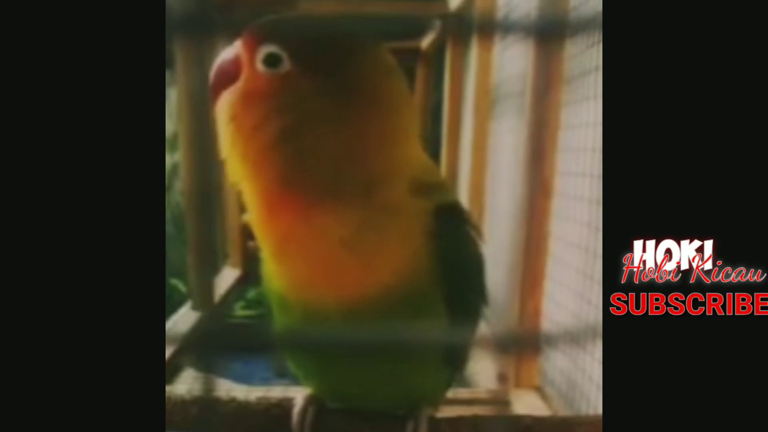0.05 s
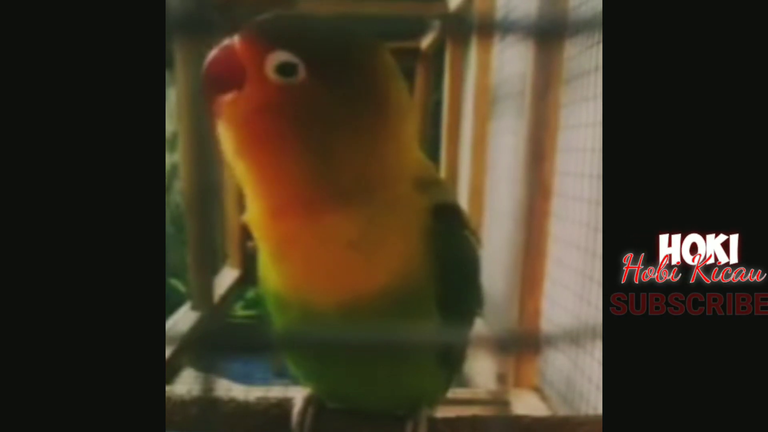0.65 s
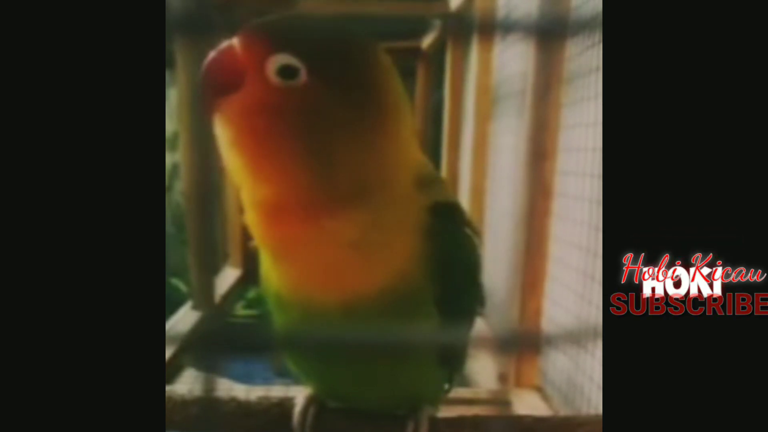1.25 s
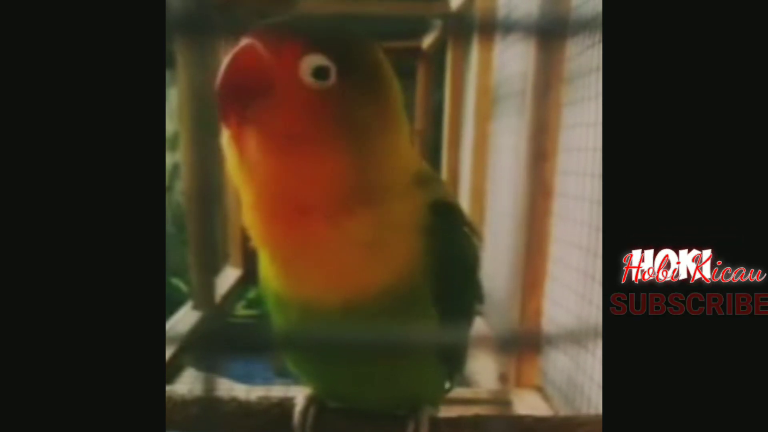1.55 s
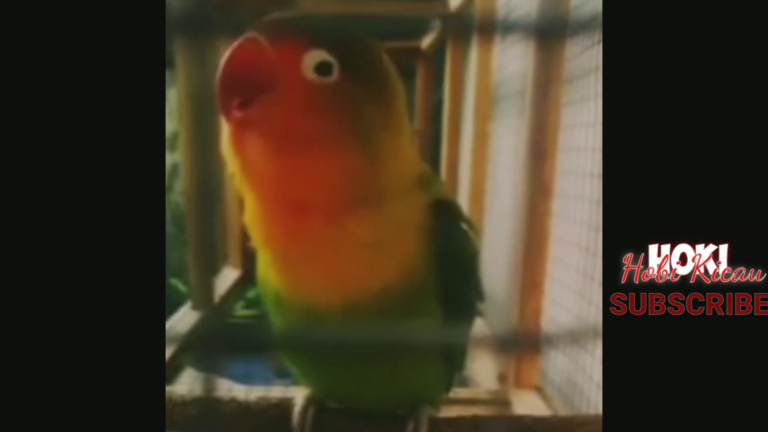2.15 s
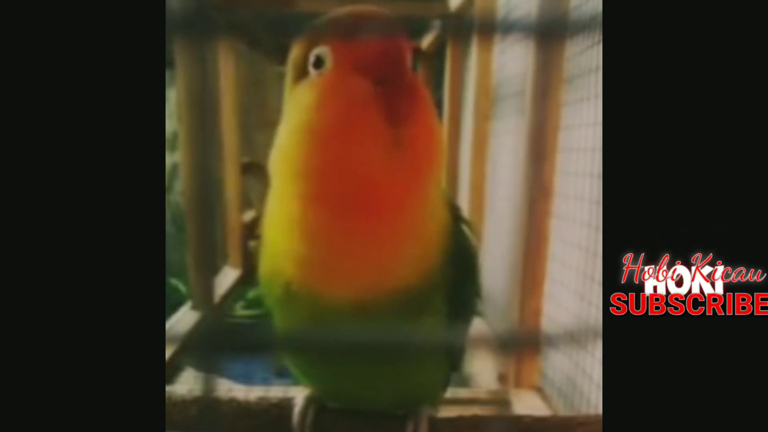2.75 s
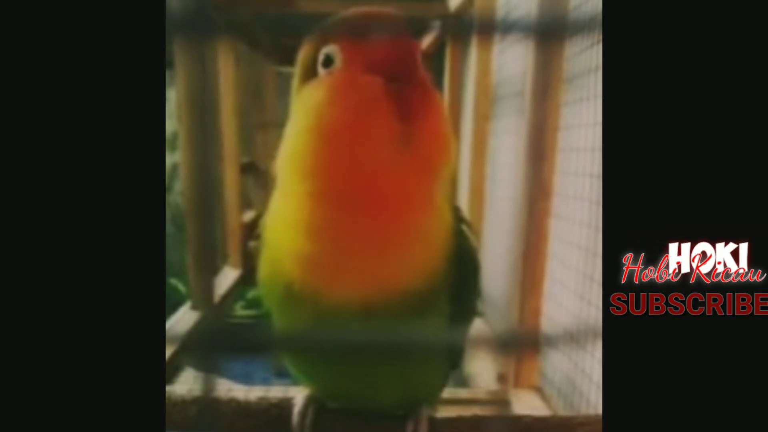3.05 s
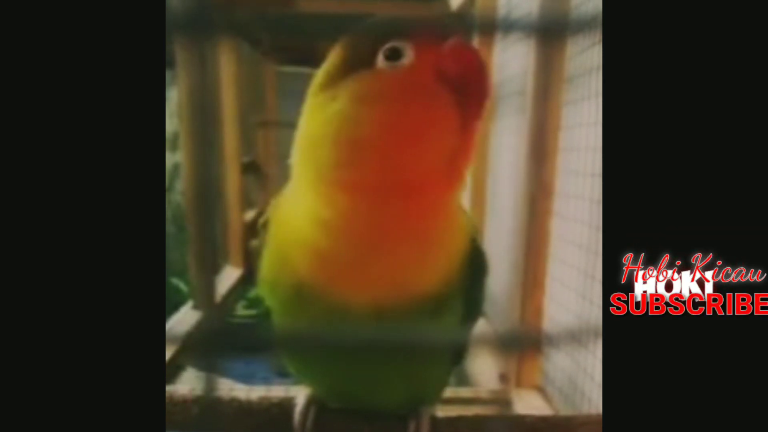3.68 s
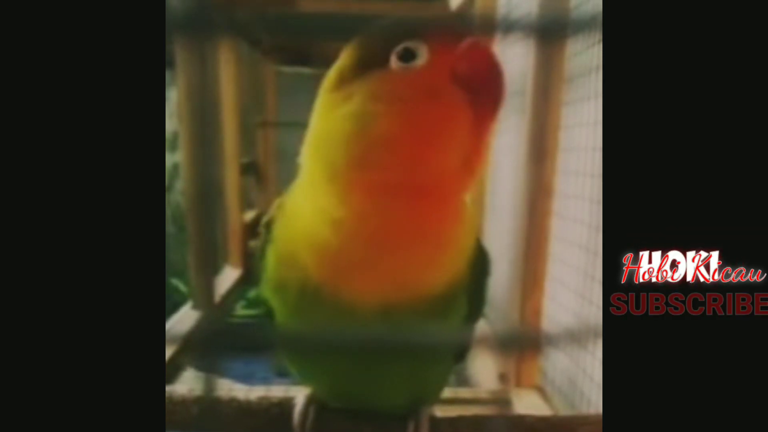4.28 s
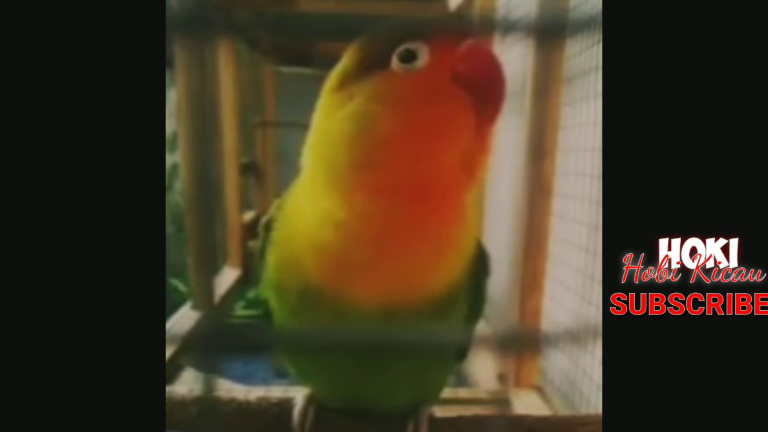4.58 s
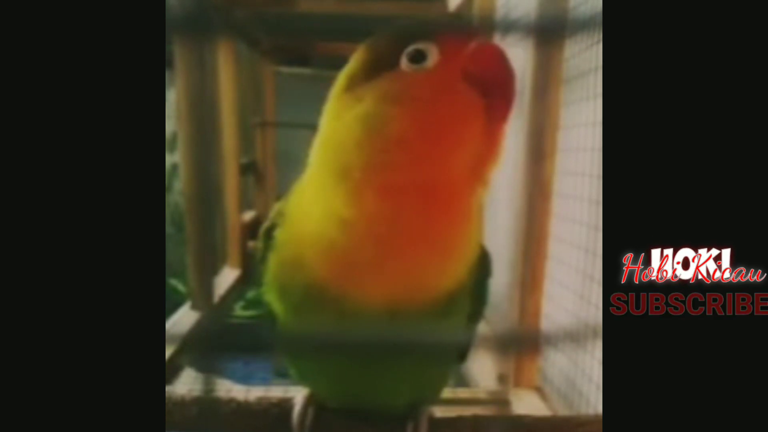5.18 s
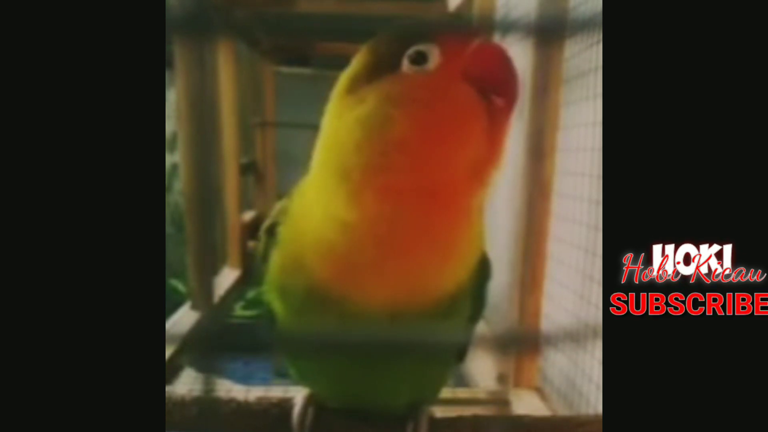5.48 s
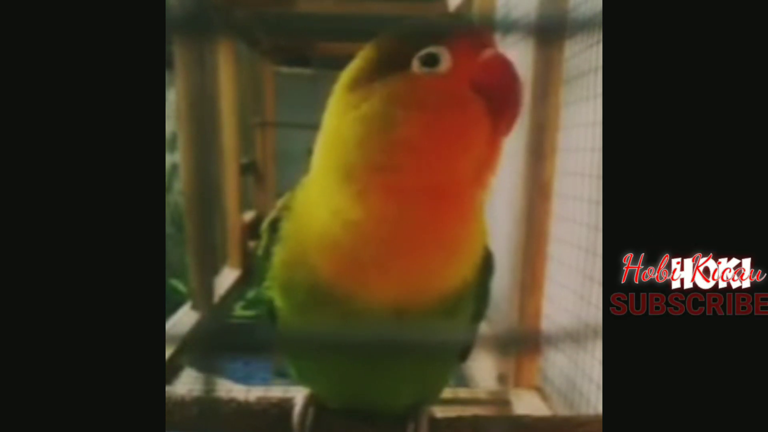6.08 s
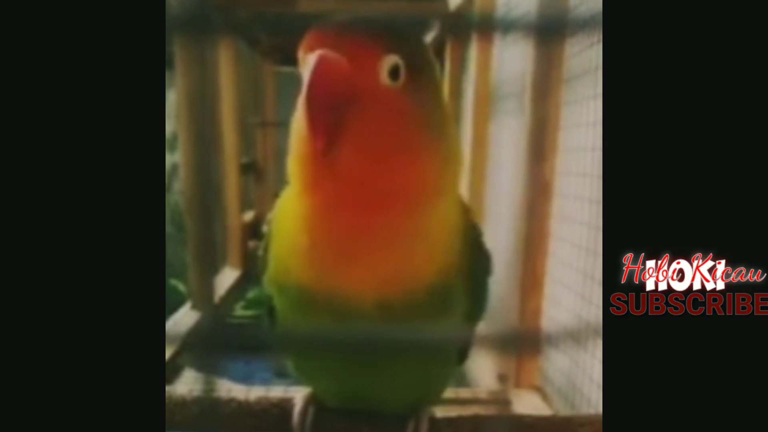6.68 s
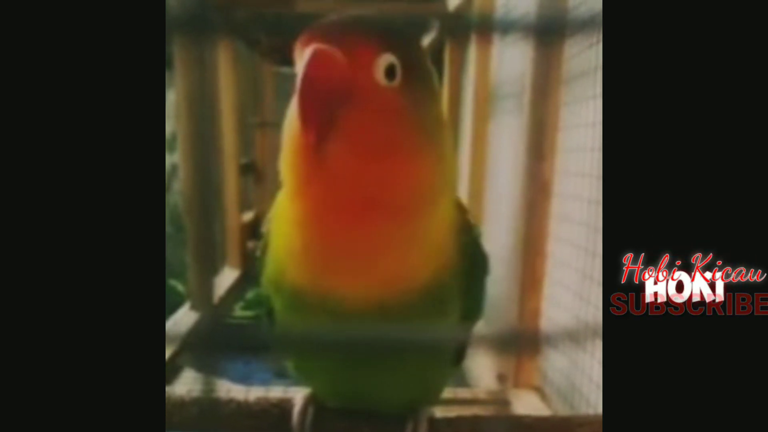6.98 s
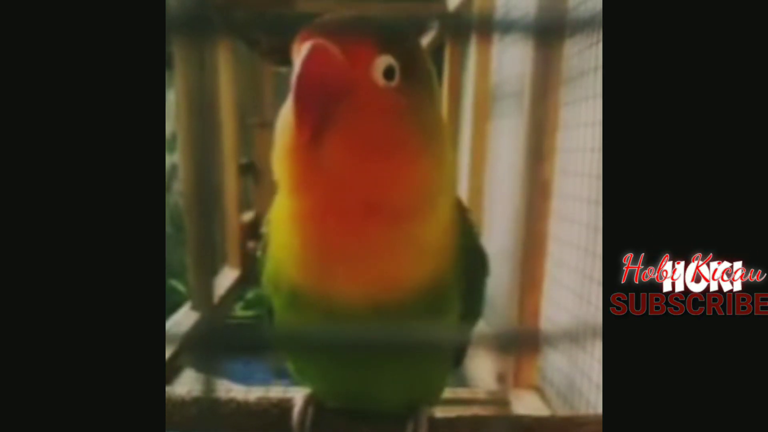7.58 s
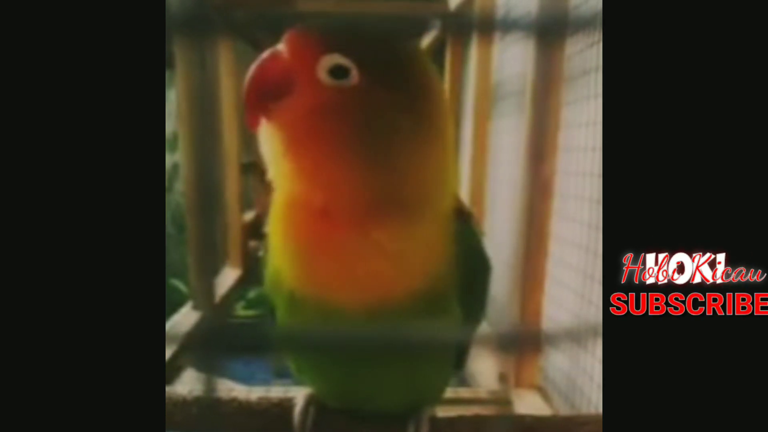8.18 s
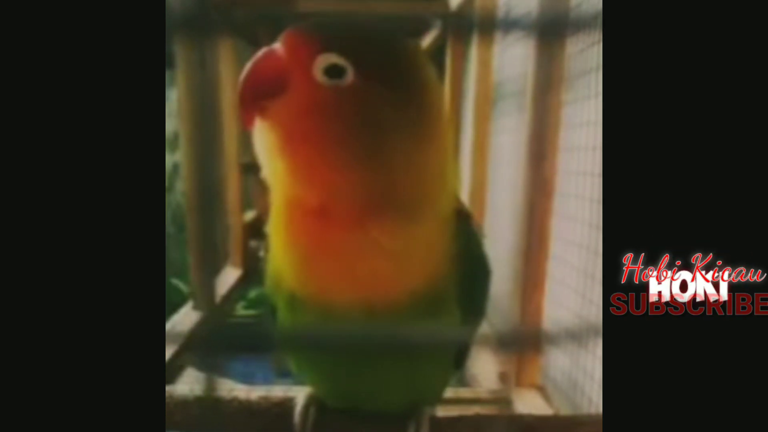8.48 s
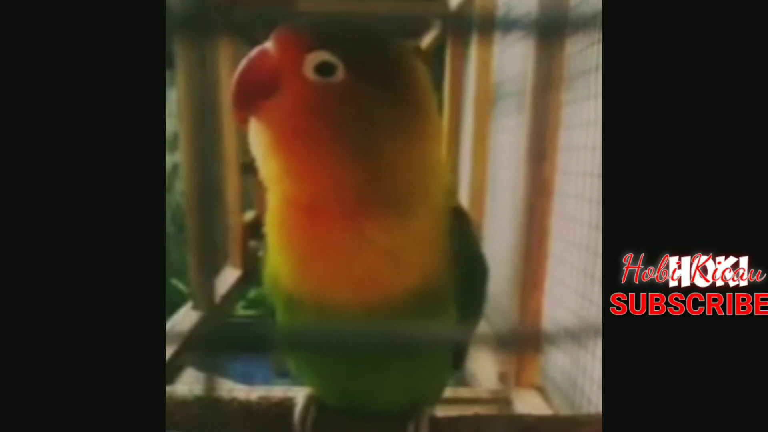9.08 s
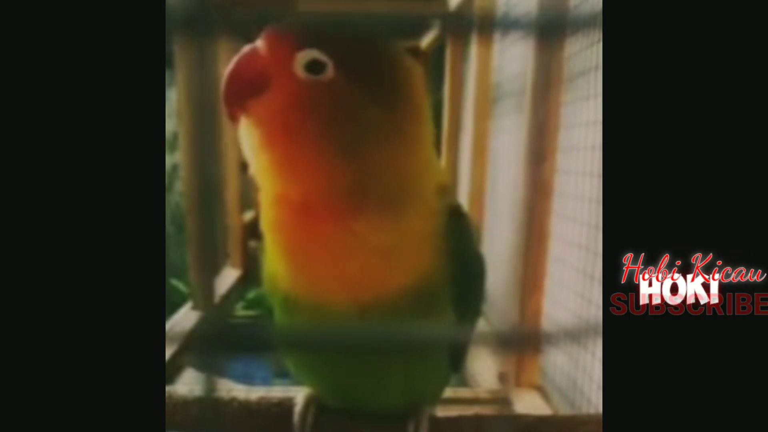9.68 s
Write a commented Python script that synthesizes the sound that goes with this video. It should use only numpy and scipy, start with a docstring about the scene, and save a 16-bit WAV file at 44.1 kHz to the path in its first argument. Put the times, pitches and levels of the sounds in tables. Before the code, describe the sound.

Close up, a small parrot in a cage sings a rapid string of high, flicking whistles that repeatedly break into a brighter, harsher rasp. After one short gap it resumes slightly lower and slower, then turns shrill again. Thin whistles from other birds come from further away near the start and later on, with a short room echo and faint background noise.

```python
"""Caged lovebird chattering

A close lovebird chatters about seven syllables a second, with one short pause. Each syllable is a
whistle that flicks up and slides down; in bouts the bird pushes harder and the voice breaks into a
shrill rasp. Cage and room ring after each one. Other birds whistle further off, over soft noise."""
import sys
import numpy as np
from scipy import signal
from scipy.fft import rfft, irfft
from scipy.io import wavfile
from scipy.ndimage import uniform_filter1d

SR = 44100
rng = np.random.default_rng(int(sys.argv[2]) if len(sys.argv) > 2 else 0)


def master_out(mix):
    """Clip the mix to full scale and print it as 16-bit PCM to the path in sys.argv[1]."""
    frames = np.transpose(np.atleast_2d(mix))
    ceiling = np.clip(frames, -1, 1)
    pcm = np.round(ceiling * 32767).astype(np.int16)
    wavfile.write(sys.argv[1], SR, pcm)


N = 433944
LEAD = SR // 10  # samples of chatter before time zero


# Clear syllables: flick_s, top_hz, hold_s, level_db
CLEAR_SYLLABLES = [(-.031, 3784, .025, -22), (.141, 3680, 0.032, -21.5), (.303, 3686, 0.035, -21.5),
                   (1.008, 3790, 0.026, -22.5), (1.156, 3975, 0.028, -21.5), (1.302, 3827, 0.031, -22),
                   (1.435, 3825, 0.027, -21.5), (1.581, 3710, 0.029, -20.5), (1.712, 3700, .026, -21.5),
                   (1.842, 3937, 0.026, -20.5), (2.538, 4017, .025, -18), (2.667, 3870, 0.03, -19),
                   (2.819, 3890, 0.027, -21), (2.957, 3914, 0.022, -20), (3.113, 3900, 0.022, -21.5),
                   (3.253, 3916, .022, -20.5), (3.396, 4096, 0.023, -19.5), (3.966, 3960, .028, -21),
                   (4.117, 3828, 0.028, -22), (4.275, 3787, 0.027, -22.5), (4.436, 3785, 0.024, -21.5),
                   (4.578, 3865, 0.021, -22), (4.715, 3800, 0.032, -21.5), (4.863, 3945, 0.024, -21),
                   (5.005, 3867, 0.026, -22), (5.142, 3945, 0.026, -22), (5.274, 4020, 0.022, -21.5),
                   (5.972, 4133, .025, -20.5), (6.586, 3453, .02, -21), (6.83, 3626, 0.024, -21.5),
                   (6.978, 3628, 0.028, -20), (7.144, 3637, 0.03, -19), (7.318, 3520, .027, -19),
                   (7.483, 3623, 0.03, -19.5), (7.65, 3595, 0.031, -20.5), (7.837, 3620, 0.031, -22),
                   (8.01, 3610, 0.031, -21.5), (8.186, 3524, 0.029, -20.5), (8.361, 3600, 0.03, -21.5),
                   (8.543, 3680, 0.031, -21), (9.43, 4017, 0.031, -20), (9.579, 3865, 0.025, -21.5),
                   (9.729, 3863, 0.028, -21)]

def clear_chatter():
    """Clear whistles; those pushed above break_hz start to rasp."""
    out = np.zeros(LEAD + N)
    break_hz, break_db_per_hz = 3917, .0781
    pitch = dict(foot_hz=2120, flick_s=.001276, end_hz=1099, slide_share=1.4)
    effort = dict(ahead_s=.0002, attack_db_per_s=2450, sag_db_per_s=75, release_db_per_s=1900,
                  treble_fade_db_per_s=169.5, treble_shut_db=4, burst_db=0)
    for flick_s, top_hz, hold_s, level_db in CLEAR_SYLLABLES:
        flick_s += LEAD / SR
        rasp_db = -23 + break_db_per_hz * max(top_hz - break_hz, 0)
        sheen_db = np.array([-11, -9.5, -28]) + 1.3 * rng.standard_normal()
        add(out, *syllable(flick_s, top_hz, hold_s, level_db, rasp_db, sheen_db, pitch, effort,
                           jitter=.04, wander=.028, flutter_hz=700, grain_db=4, treble_grain_db=4,
                           scratch=.45, rasp_noise=.6, sheen_noise=.26))
        add(out, *tick(flick_s - .016))
    return out


# Shrill syllables: flick_s, level_db, brightness_db
SHRILL_SYLLABLES = [(.449, -26.5, 0.5), (.588, -26, 7.5), (0.729, -26, 3), (.867, -26, -12),
                    (1.975, -29.5, 4), (2.11, -28, 2.5), (2.246, -25, 6), (2.386, -25.5, 4),
                    (3.539, -27.5, 4.5), (3.668, -27, -1), (3.816, -28, -13.5), (5.403, -27.5, -8.5),
                    (5.535, -27, -1.5), (5.681, -25, -0.5), (5.83, -23.5, -11.5), (8.712, -26, 5.5),
                    (8.861, -26.5, 7.5), (9.003, -27, 10), (9.147, -26, 6), (9.294, -25.5, -7.5)]

def shrill_chatter():
    """Pushed harder, the voice breaks into a rasp. Duller syllables slide down more slowly."""
    out = np.zeros(LEAD + N)
    effort = dict(ahead_s=.0068, attack_db_per_s=2201, sag_db_per_s=32.5, release_db_per_s=1201,
                  treble_fade_db_per_s=21, treble_shut_db=4.5, burst_db=2)
    for flick_s, level_db, brightness_db in SHRILL_SYLLABLES:
        flick_s += LEAD / SR
        top_hz = 5322 * rng.lognormal(0, .04)
        hold_s = .02 * rng.lognormal(0, .07)
        rasp_db = 3.5
        sheen_db = np.array([.7, 5, -4.5]) + brightness_db * np.array([.21, .3, .85])
        slide_share = .14 + .05 * max(-brightness_db, 0)
        pitch = dict(foot_hz=2324, flick_s=.003, end_hz=2420, slide_share=slide_share)
        add(out, *syllable(flick_s, top_hz, hold_s, level_db, rasp_db, sheen_db, pitch, effort,
                           jitter=.08, wander=.085, flutter_hz=550, grain_db=5, treble_grain_db=3.5,
                           scratch=.7, rasp_noise=.33, sheen_noise=.45))
        add(out, *tick(flick_s - .023))
    return out


# Treble lines parallel to the whistle, each in a band of hiss: above_hz, low_hz, high_hz
SHEEN_LINES = [(3955, 5840, 8190), (6870, 8720, 11220), (10050, 11720, 14900)]

def syllable(flick_s, top_hz, hold_s, level_db, rasp_db, sheen_db, pitch, effort,
             jitter, wander, flutter_hz, grain_db, treble_grain_db, scratch, rasp_noise, sheen_noise):
    """One gliding whistle with a rasp, plus a sheen of thin treble lines gliding parallel to it."""
    t = np.arange(-1600, 2496) / SR
    size = len(t)
    waver = 1 + jitter * flutter(size, flutter_hz) + wander * flutter(size, 130)
    cycles = np.cumsum(glide(t, top_hz, hold_s, **pitch) * waver) / SR
    whistle_db, treble_db = push(t, hold_s, **effort)
    grain = np.tanh(flutter(size, flutter_hz))
    fade = signal.windows.tukey(size, .1)
    whistle_env = fade * gain_of(whistle_db + grain_db * grain)
    treble_env = fade * gain_of(treble_db + treble_grain_db * grain)
    # Until they lock onto the note, the membranes scratch and sound the octave.
    unlocked = 1 / (1 + np.exp((t + effort["ahead_s"] + .0066) / .0022))
    octave = np.sin(4 * np.pi * cycles)
    onset = unlocked * (.66 * octave + scratch * band_noise(size, 3800, 5400))
    sound = unit_rms(whistle_env * (np.sin(2 * np.pi * cycles) + onset))
    # Rasp: the ragged octave through the open beak's resonance.
    beak_hz = (4210, 6100)
    rasp = blend(unit_rms(band_pass(octave, *beak_hz)), band_noise(size, *beak_hz), rasp_noise)
    sound += gain_of(rasp_db) * unit_rms(np.sqrt(whistle_env * treble_env) * rasp)
    for (above_hz, low_hz, high_hz), line_db in zip(SHEEN_LINES, sheen_db):
        line = unit_rms(np.sin(2 * np.pi * (cycles + above_hz * t + rng.random())))
        sheen = treble_env * blend(line, band_noise(size, low_hz, high_hz), sheen_noise)
        sound += gain_of(line_db) * unit_rms(band_pass(sheen, low_hz, high_hz, order=12))
    # Nearest-wall bounces; delays differ per syllable as the bird bobs.
    heard = sound.copy()
    for delay_s in rng.uniform(.003, .011, size=2):
        add(heard, delay_s, gain_of(-15) * sound)
    return flick_s + t[0], gain_of(level_db) * heard


def glide(t, top_hz, hold_s, foot_hz, flick_s, end_hz, slide_share):
    """Pitch in Hz: a creep, a quick flick to the top at t = 0, a slide down."""
    creep_hz_per_s = 27000
    up = foot_hz + creep_hz_per_s * t + (top_hz - foot_hz) * np.exp(-abs(t) / flick_s)
    down = end_hz + (top_hz - end_hz) * np.exp(-abs(t) / (slide_share * hold_s))
    return np.where(t < 0, up, down)


def push(t, hold_s, ahead_s, attack_db_per_s, sag_db_per_s, release_db_per_s,
         treble_fade_db_per_s, treble_shut_db, burst_db, burst_s=.0025):
    """Attack, sagging hold and release in dB. The treble opens at the flick and fades faster."""
    before_s, since_s, after_s = np.maximum([-t - ahead_s, t, t - hold_s], 0)
    whistle_db = -attack_db_per_s * before_s - sag_db_per_s * since_s - release_db_per_s * after_s
    opening_db = np.where(t < 0, -treble_shut_db, burst_db * np.exp(-since_s / burst_s))
    return whistle_db, whistle_db + opening_db - treble_fade_db_per_s * since_s


def tick(start_s):
    """Faint dry pulse ahead of a syllable. Returns start_s, sound."""
    t = np.arange(512) / SR
    offset_s, level_db = rng.normal(0, .002), rng.normal(-32.5, 1.5)
    puff = band_noise(len(t), 1400, 3400) + .7 * band_noise(len(t), 3000, 9500)
    envelope = t / .00085 * np.exp(-t / .0016)
    return start_s + offset_s, gain_of(level_db) * puff * envelope


# Cage wall reflections: delay_ms, gain_db
CAGE_ECHOES = [(2.93, -30.5), (6.93, -29), (13.4, -28), (17.8, -33)]
# Cage peaks and hollows: centre_hz, width_hz, gain_db
CAGE_RESONANCES = [(2194, 69, 10), (2223, 80, -6), (2493, 132, 6), (2641, 42, -4), (2734, 183, 5),
                   (2955, 40, 6.5), (3120, 34, -0.5), (3835, 46, -10.5), (4470, 31, -22), (6170, 280, -6),
                   (8500, 53, -5.5), (11940, 380, 6.5)]

def cage(x):
    """Wall echoes, then the cage's colour as a minimum-phase filter."""
    echoed = x.copy()
    for delay_ms, gain_db in CAGE_ECHOES:
        add(echoed, delay_ms / 1000, gain_of(gain_db) * x)
    hz = abs(np.fft.fftfreq(4096, 1 / SR))
    colour_db = sum(gain_db * np.exp(-((hz - centre_hz) / width_hz) ** 2)
                    for centre_hz, width_hz, gain_db in CAGE_RESONANCES)
    log_spectrum = np.conj(signal.hilbert(np.log(gain_of(colour_db))))
    impulse = np.fft.ifft(np.exp(log_spectrum)).real
    return signal.oaconvolve(echoed, impulse)[:len(x)]


# Room decay: frequency_hz, t60_s
ROOM_DECAY = [(300, 0.27), (2000, 0.25), (3000, 0.25), (5000, 0.33), (7500, 0.32), (10000, 0.26),
              (14000, 0.29)]

def room_tail(x):
    """Sparse reflections of random sign, each band dying at its own rate."""
    size = SR // 2
    taps = rng.choice([-1., 1.], size) * (rng.random(size) < .15)
    hz, t, spectrum = signal.stft(taps, SR, nperseg=256)
    decay = gain_of(-60 * t / curve_at(ROOM_DECAY, hz)[:, None])
    tail = signal.istft(spectrum * decay, SR, nperseg=256)[1]
    age_s = np.arange(len(tail)) / SR
    # Early cage reflections give way to the weaker room.
    tail *= (1 - np.exp(-age_s / .00033)) * (1 + 1.31 * np.exp(-age_s / .057))
    return signal.fftconvolve(x, tail / np.linalg.norm(tail))[:len(x)]


def shifting_room(x):
    """Three tails crossfade slowly as the bird turns its head."""
    crossfade_hz = .599
    cycles = crossfade_hz * np.arange(len(x)) / SR
    return np.sqrt(2 / 3) * sum(room_tail(x * np.cos(np.pi * (cycles + k / 3))) for k in range(3))


# Other birds: start_s, length_s, first_hz, last_hz, level_db
FAR_CALLS = [(0.185, 0.082, 4485, 4780, -31.5), (0.263, 0.18, 4700, 4645, -35.5),
             (0.628, 0.23, 2515, 2665, -36.5), (0.937, 0.22, 3860, 3450, -30),
             (3.83, 0.044, 4640, 4470, -47), (7.397, 0.13, 2870, 3040, -37.5),
             (7.717, 0.13, 2420, 2430, -33.5), (7.923, 0.19, 2950, 2890, -31.5),
             (8.214, 0.15, 2290, 2355, -35)]

def far_birds():
    """Thin, wavering whistles on straight glides."""
    out = np.zeros(N)
    for start_s, length_s, first_hz, last_hz, level_db in FAR_CALLS:
        size = int(length_s * SR)
        waver = 1 + .014 * flutter(N // 16, rate_hz=250)[:size]
        hz = np.linspace(first_hz, last_hz, size) * waver
        whistle = np.sin(2 * np.pi * np.cumsum(hz) / SR) * signal.windows.tukey(size, .5)
        add(out, start_s, gain_of(level_db) * unit_rms(whistle))
    return out


# Distant hollow sounds: start_s, length_s, centre_hz, width_hz, level_db
FAR_PUFFS = [(3.521, 0.076, 1100, 403, -38), (3.748, 0.089, 1040, 500, -45), (3.885, 0.14, 1347, 250, -35),
             (3.793, 0.24, 500, 450, -52.5), (4.43, 0.15, 853, 249.4, -57), (6.083, 0.072, 847, 120, -53.5),
             (6.072, 0.073, 1260, 200, -51.5)]

def far_puffs():
    """Faint, dull swells of narrow-band noise."""
    out = np.zeros(N)
    for start_s, length_s, centre_hz, width_hz, level_db in FAR_PUFFS:
        size = int(length_s * SR)
        noise = band_noise(SR, centre_hz - width_hz / 2, centre_hz + width_hz / 2)[:size]
        add(out, start_s, gain_of(level_db) * unit_rms(noise * np.hanning(size)))
    return out


# Background spectrum: frequency_hz, relative_db
AIR_SPECTRUM = [(25, -5.5), (80, -14.5), (160, -3.5), (280, 1), (450, -3), (800, 2), (1500, -5.5),
                (2400, -10.5), (6000, -25), (15000, -37.5)]
# Background level: time_s, level_db
AIR_LEVEL = [(0.0, -61), (2.27, -58), (3.92, -54), (4.11, -61.5), (5.7, -58.5), (6.0, -56), (6.19, -68.5),
             (6.58, -65.5), (7.01, -54), (7.34, -51.5), (7.97, -65), (8.52, -61.5), (8.85, -50.5),
             (9.84, -60)]

def air():
    """Soft, patchy background noise that sinks in the pause."""
    frames = dict(fs=SR, nperseg=2048, noverlap=1536)
    hz, _, spectrum = signal.stft(rng.standard_normal(N), **frames)
    patches = uniform_filter1d(rng.standard_normal(spectrum.shape), size=4, axis=0)
    patches_db = 4.2 * unit_rms(uniform_filter1d(patches, size=12, axis=1))
    spectrum *= gain_of(curve_at(AIR_SPECTRUM, hz)[:, None] + patches_db)
    noise = signal.istft(spectrum, **frames)[1][:N]
    level_db = np.interp(np.arange(N) / SR, *np.transpose(AIR_LEVEL))
    return unit_rms(noise) * gain_of(level_db + 2.4 * flutter(N, rate_hz=10))


def gain_of(db):
    """Decibels to amplitude."""
    return 10 ** (np.asarray(db) / 20)


def unit_rms(x):
    """Scales to rms 1."""
    return x / np.sqrt(np.mean(x ** 2) + 1e-20)


def curve_at(points, hz):
    """Interpolates a table on a log-frequency axis."""
    point_hz, values = np.transpose(points)
    return np.interp(np.log(hz + 1), np.log(point_hz + 1), values)


def add(mix, start_s, sound):
    """Mixes a sound in at start_s, trimmed to the mix."""
    start = round(start_s * SR)
    sound = sound[max(-start, 0):]
    part = mix[max(start, 0):][:len(sound)]
    part += sound[:len(part)]


def band_pass(x, low_hz, high_hz, order=8):
    """Zero-phase band-pass with soft edges."""
    offset = (2 * np.fft.rfftfreq(len(x), 1 / SR) - low_hz - high_hz) / (high_hz - low_hz)
    return irfft(rfft(x) / np.sqrt(1 + offset ** order), len(x))


def band_noise(size, low_hz, high_hz):
    """Band of noise, rms 1."""
    return unit_rms(band_pass(rng.standard_normal(size), low_hz, high_hz))


def flutter(size, rate_hz):
    """Random wavering up to rate_hz, rms 1."""
    return band_noise(size, -rate_hz, rate_hz)


def blend(tone, noise, noise_share):
    """Constant-power mix of tone and noise."""
    return np.sqrt(1 - noise_share) * tone + np.sqrt(noise_share) * noise


def scene():
    """Close bird, distant sounds and background, the same in both channels."""
    bird = clear_chatter() + shrill_chatter()
    far = far_birds() + far_puffs()
    near = cage(bird + gain_of(-6.5) * shifting_room(bird))[LEAD:]
    mono = near + gain_of(-4.5) * far + gain_of(-2) * room_tail(far) + air()
    return np.array([mono, mono])


def record(dry):
    """Clips at full scale, then low-passes."""
    cutoff_hz = 15050
    low_pass = signal.firwin(401, cutoff_hz, window=("kaiser", 7), fs=SR)
    return signal.oaconvolve(np.clip(dry, -1, 1), low_pass[None], "same")


dry = scene()
out = record(dry)
master_out(out)
```